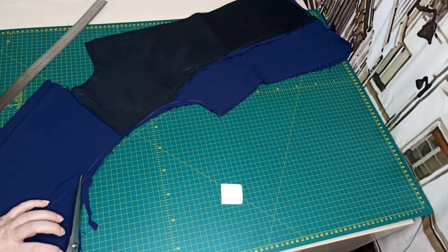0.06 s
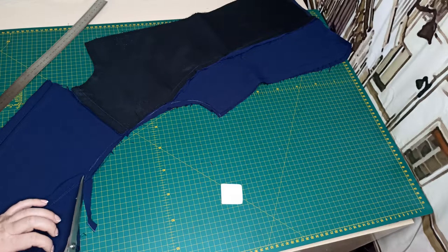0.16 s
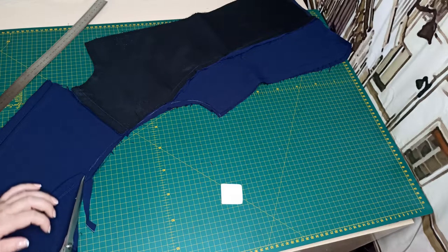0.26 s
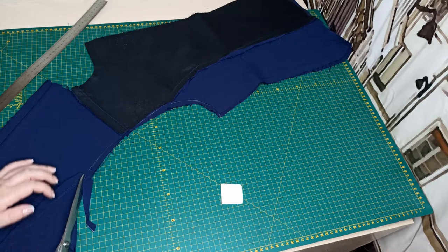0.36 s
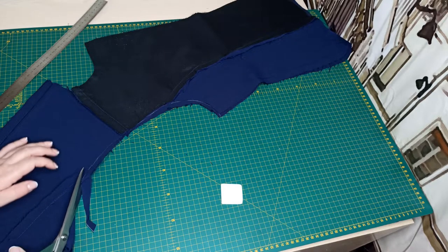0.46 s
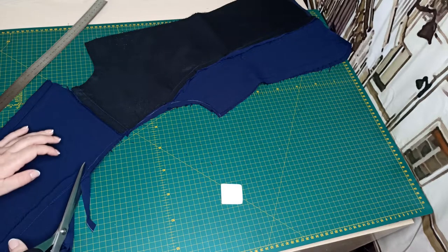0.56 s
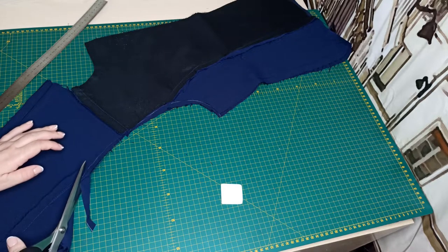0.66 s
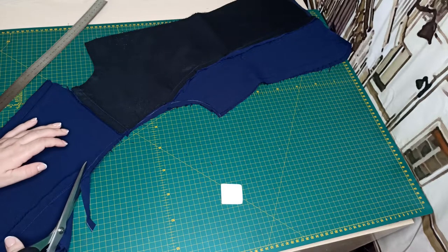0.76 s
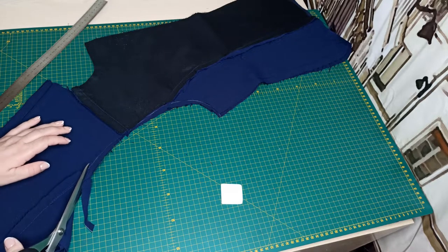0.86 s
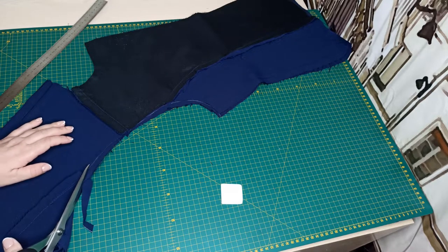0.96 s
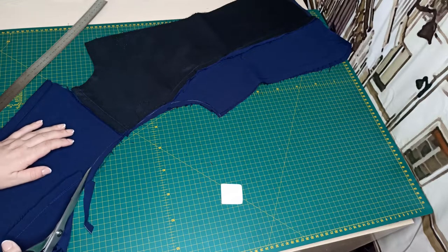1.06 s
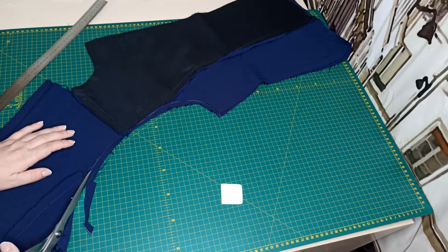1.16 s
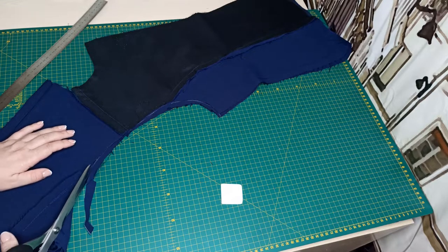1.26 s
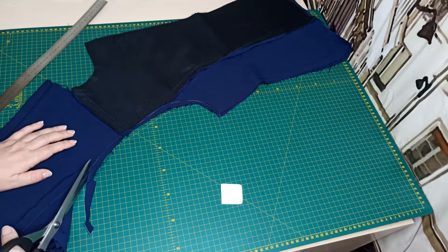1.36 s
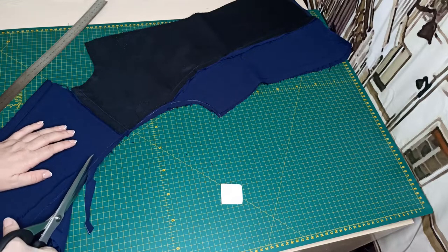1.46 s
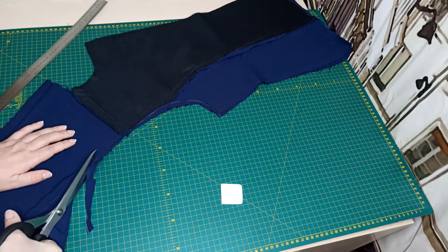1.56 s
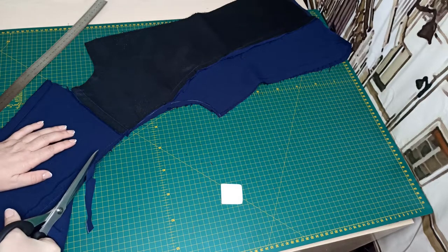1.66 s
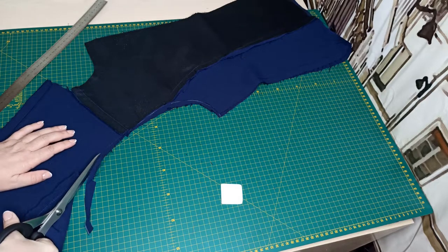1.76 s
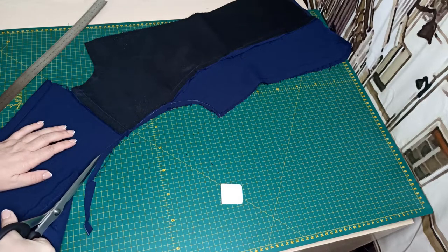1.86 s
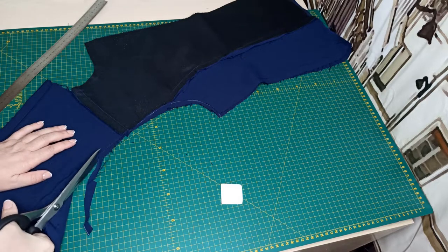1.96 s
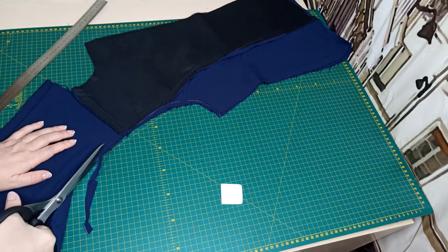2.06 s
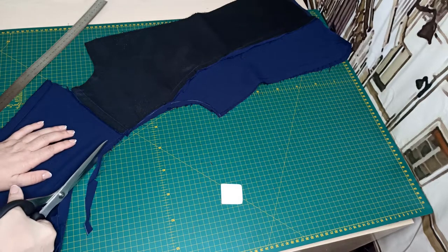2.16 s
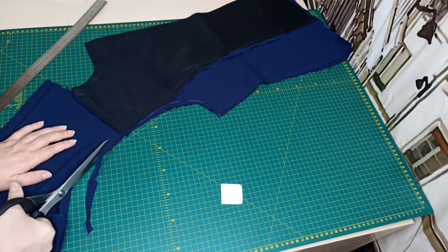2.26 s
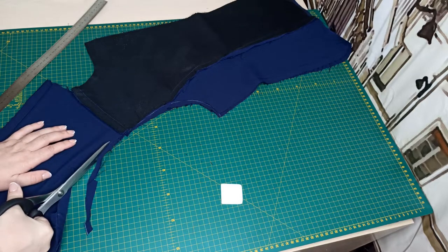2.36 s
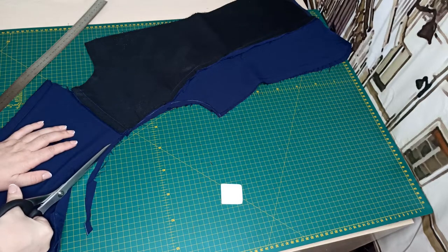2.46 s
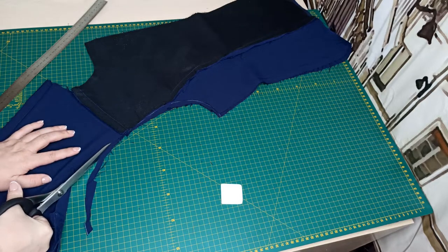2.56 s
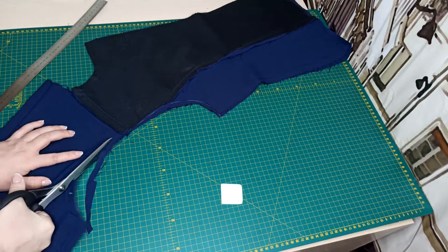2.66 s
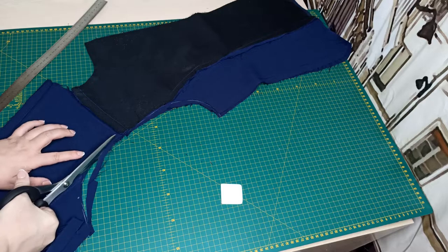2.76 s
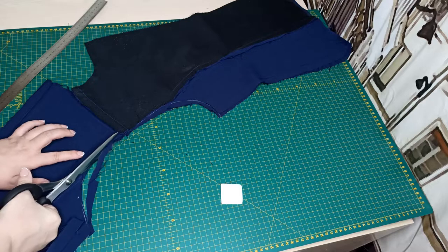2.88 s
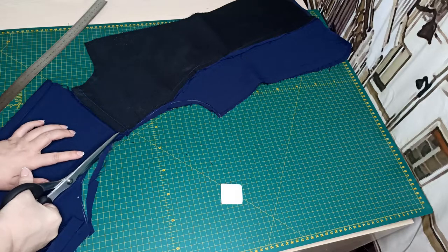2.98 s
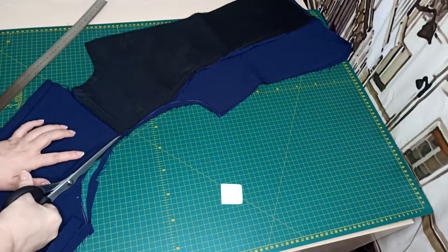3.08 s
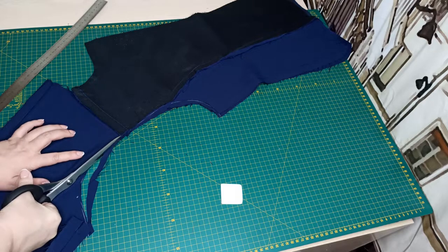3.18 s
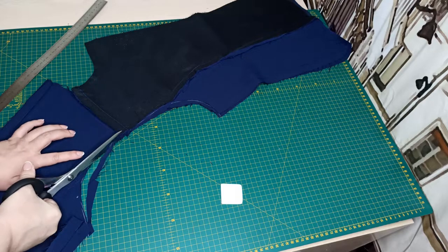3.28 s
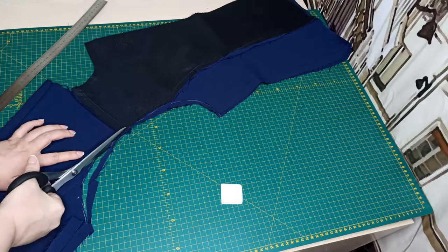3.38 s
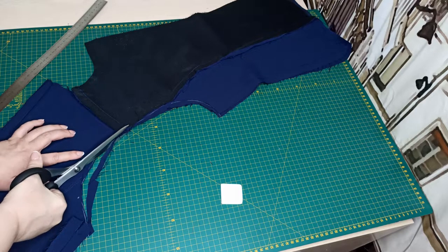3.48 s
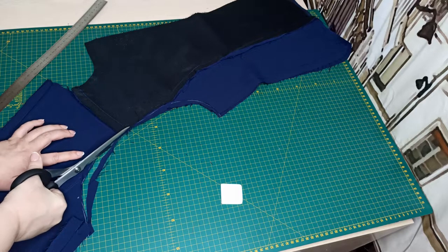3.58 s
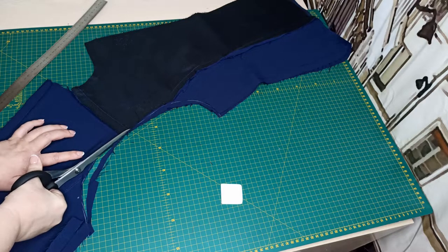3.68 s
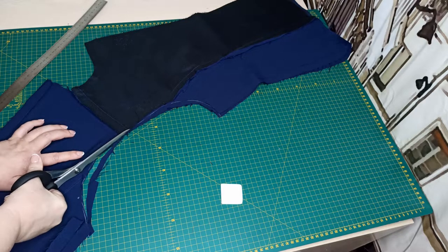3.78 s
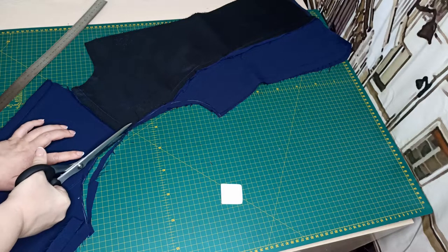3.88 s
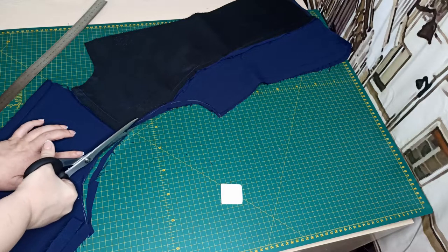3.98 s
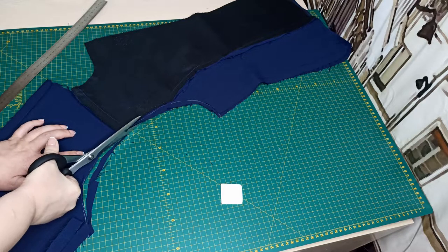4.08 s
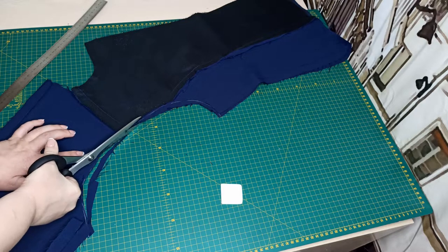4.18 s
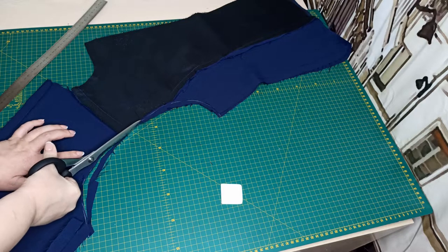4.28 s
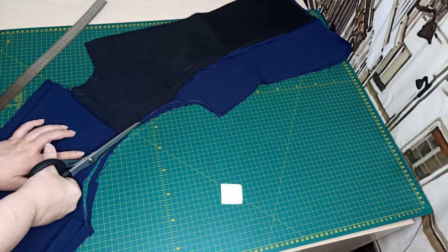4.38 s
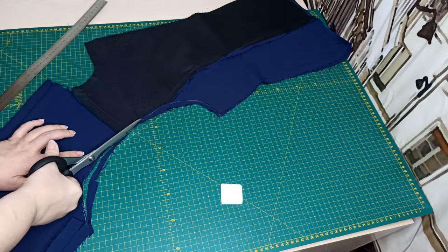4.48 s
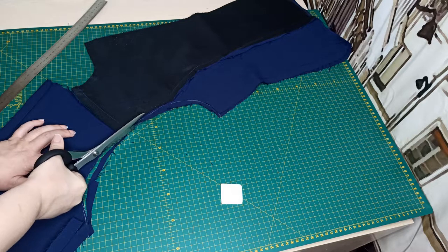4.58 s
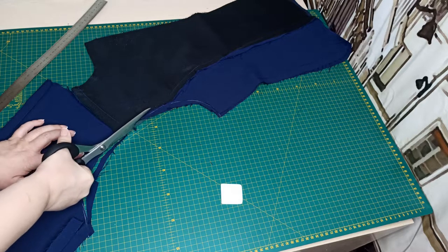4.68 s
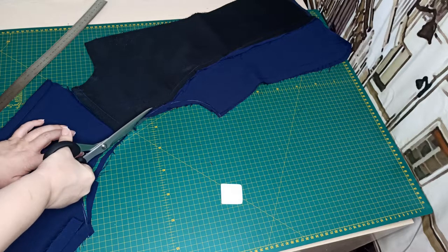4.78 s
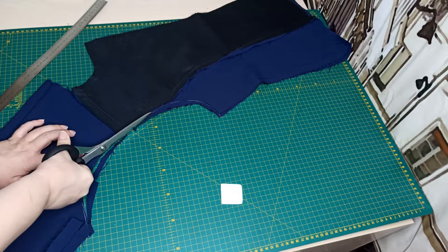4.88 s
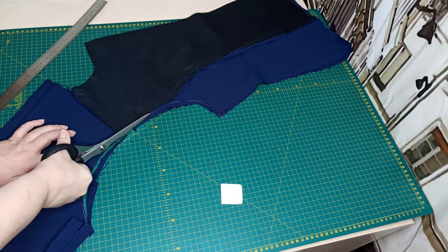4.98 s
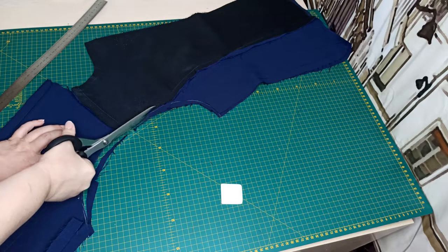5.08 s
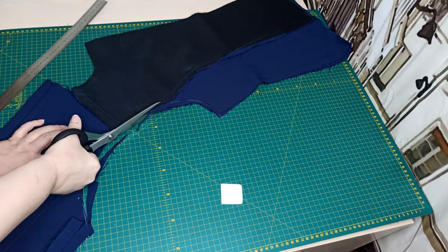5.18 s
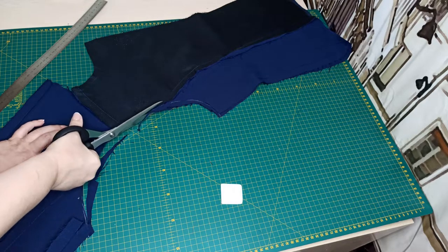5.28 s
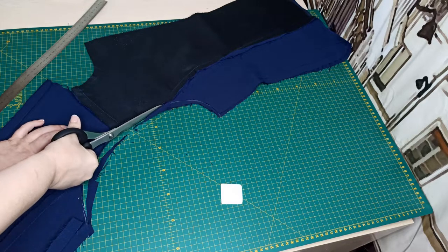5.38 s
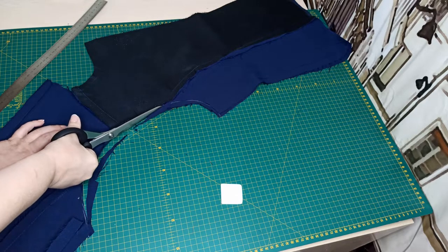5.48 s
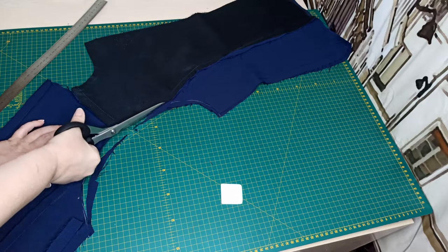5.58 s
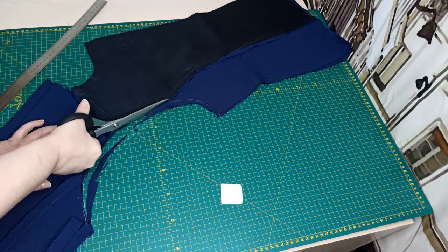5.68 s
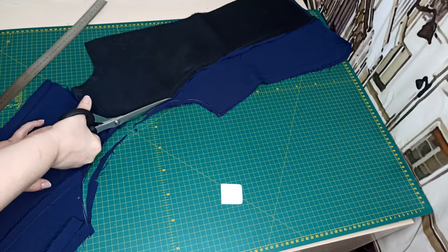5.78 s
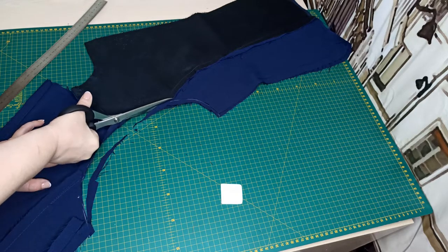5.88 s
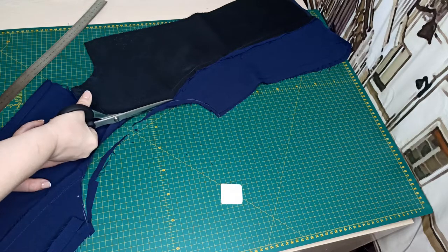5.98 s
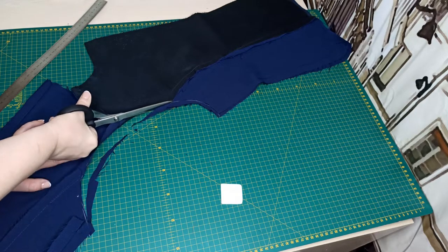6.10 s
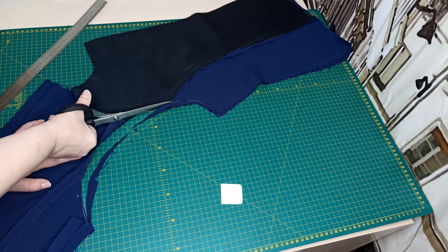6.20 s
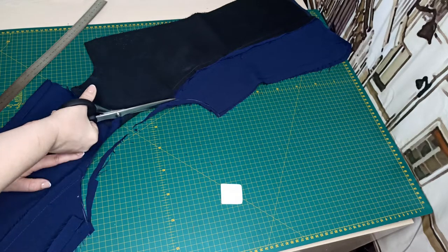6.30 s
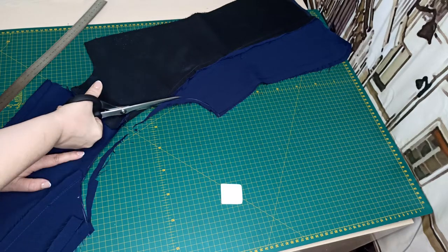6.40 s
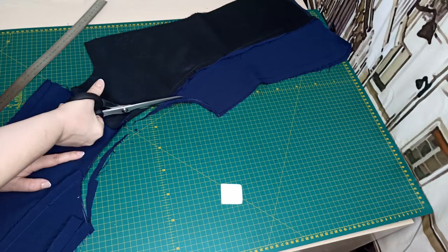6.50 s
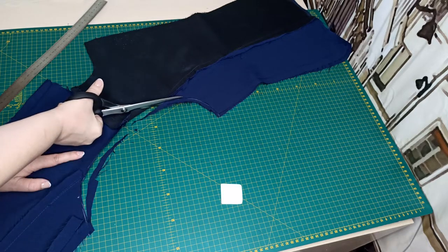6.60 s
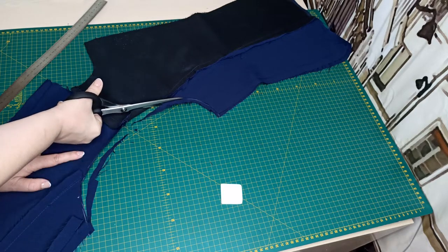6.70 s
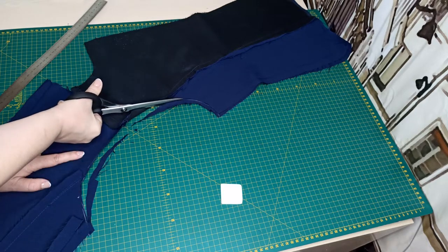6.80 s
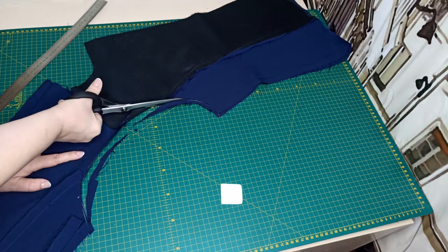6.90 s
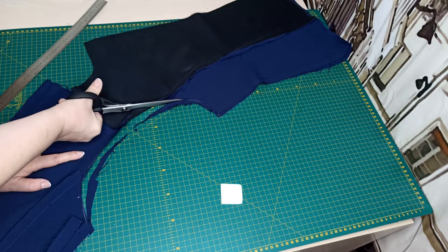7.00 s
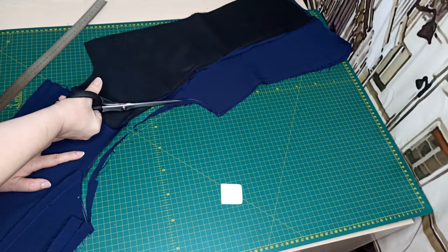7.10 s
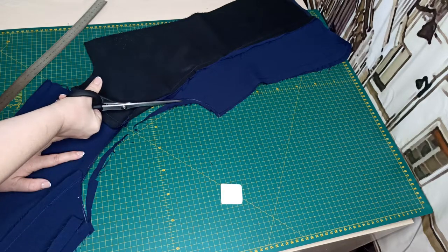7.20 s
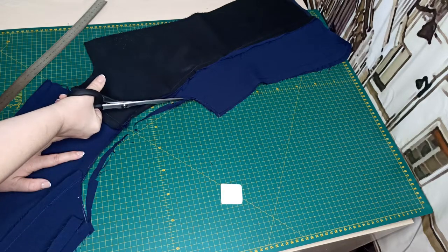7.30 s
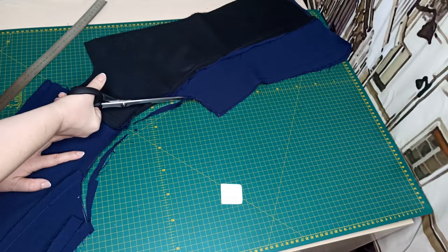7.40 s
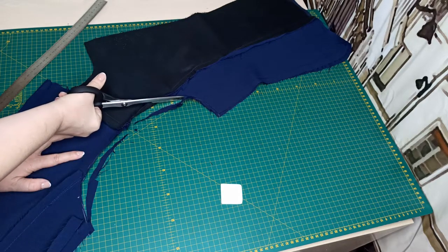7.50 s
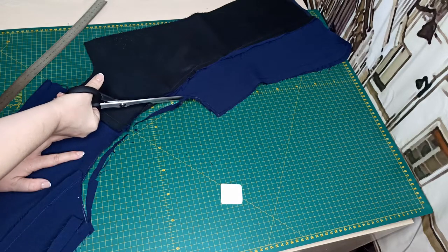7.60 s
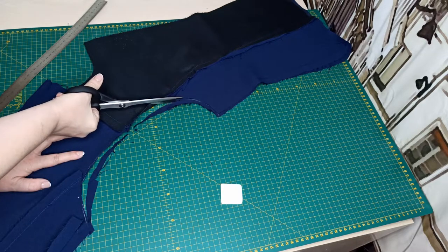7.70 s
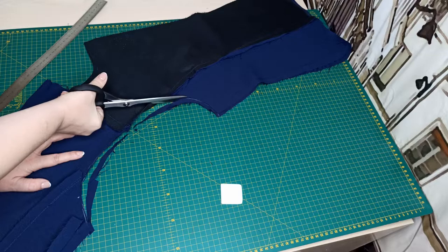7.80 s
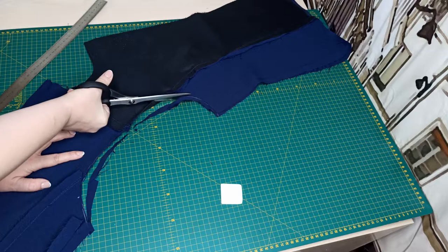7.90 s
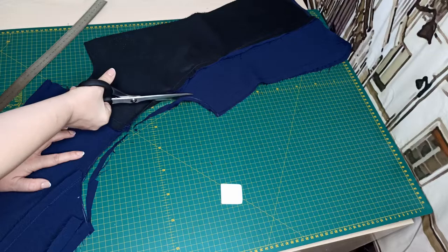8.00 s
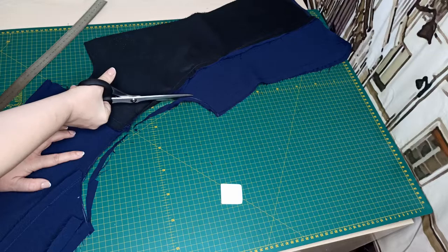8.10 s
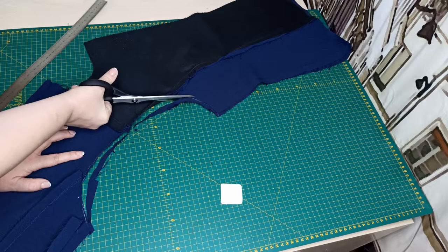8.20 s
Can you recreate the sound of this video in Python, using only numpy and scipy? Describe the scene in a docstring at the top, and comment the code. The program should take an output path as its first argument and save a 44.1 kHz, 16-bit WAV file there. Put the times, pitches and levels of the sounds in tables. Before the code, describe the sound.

Slow, regular scissor cuts in heavy fabric: gritty crunch, low table thump, faint steel rasp, then lighter ringing nips and ticks near the end.

```python
"""Tailor's shears cut thick cloth on a mat, on a table in a small room.
Closing strokes: random thread snaps, gated per stroke, drive table, mat and blade resonances.
Bites add sudden jolts and noise bursts; some strokes squeak in narrow noise bands.
Between strokes the blades slide on with a duller rub; late short nips and light taps ring steel.
Behind: steady room noise, and cloth rustle and hiss under the free hand."""
import sys
import numpy as np
from scipy import signal
from scipy.fft import rfft, irfft
from scipy.io import wavfile
from scipy.ndimage import uniform_filter1d

SR = 44100
rng = np.random.default_rng(int(sys.argv[2]) if len(sys.argv) > 2 else 0)


def unload_wav(signal):
    """Save mono or channel-first audio to the path in sys.argv[1] as 16-bit WAV at rate SR, clipped to [-1, 1]."""
    wavfile.write(
        sys.argv[1],
        SR,
        np.round(np.clip(np.atleast_2d(signal).T, -1, 1) * 32767).astype(np.int16),
    )


N = 363825
TIME = np.arange(N) / SR

# Levels in the tables are relative; each function applies its own gain.
# closing strokes: bite_s, length_s, lead_in_s, rumble_db, crunch_db, rasp_db
CLOSING_STROKES = [(0.101, 0.12, 0.0036, -34, -39.5, -56.5), (1.023, .036, .02, -40, -38, -56),
                   (1.09, 0.096, 0.0035, -27.5, -40, -51.5), (1.767, 0.077, 0.039, -29, -38.5, -55.5),
                   (2.423, 0.092, .045, -29.5, -39, -56.5), (3.056, 0.1, 0.031, -28.5, -38, -55),
                   (3.611, 0.11, 0.028, -27.5, -40.5, -51.5), (4.251, 0.16, 0.024, -33.5, -45.5, -55),
                   (4.866, 0.13, 0.026, -31, -40.5, -53), (5.396, 0.11, 0.025, -34, -37.5, -51.5),
                   (6.051, 0.14, 0.071, -43, -47, -55.5), (6.726, 0.12, 0.055, -54.5, -53.5, -62)]
# table top: pitch_hz, width_hz, edge_db, middle_db (driven at its edge / near its middle)
TABLE_RESONANCES = [(87, 25, -53, -9), (118.4, 12.6, -19, -11), (168.7, 11.4, 2.5, -10),
                    (194, 31.2, 1.5, -9.5), (223.8, 20, 2.5, 6.5), (304.7, 38.5, 0, -1.5),
                    (385.6, 35.7, -3.5, -2), (438.5, 13.4, 1, 7.5), (456.4, 32, -13.5, 5),
                    (540, 46, -8, 1.5), (651, 49, -1.5, -11.5)]
# bending of the blades: pitch_hz, width_hz, level_db
BLADE_RESONANCES = [(2236, 135, 1.5), (2627, 27, 6.5), (4670, 32, -1), (5230, 24, 0.5), (6270, 59, -22)]
# blade rasp spectrum: frequency_hz, density_db_per_hz
RASP_SPECTRUM = [(1500, -43.5), (2800, 0), (3500, 0.5), (4300, 6.5), (4680, 10), (4900, 3.5), (5700, -0.5),
                 (6400, 4), (7500, -4), (10000, -5), (13000, -2), (16000, -9.5)]
# threads parting, heard through the air: frequency_hz, density_db_per_hz
FIBRE_SPECTRUM = [(400, -21.5), (700, 3), (1400, 1.5), (1900, -2.5), (2600, -1.5), (3200, -13), (6000, -32)]


def cutting():
    """Threads snap one after another; each snap shakes the table, the mat and the blades."""
    rumble_gain, crunch_gain, rasp_gain = closing()
    snaps = grains(per_s=800, spread_db=5.0)
    steel_grind = from_db(-6.5) * grains(per_s=1500, spread_db=5.5)
    edge = snaps + steel_grind
    blade_sound = colour(edge, RASP_SPECTRUM) + from_db(10.5) * resonances(edge, BLADE_RESONANCES)

    table = from_db(-2.0) * rumble_gain * steady(body(snaps, TABLE_RESONANCES), span_s=0.0264)
    mat = from_db(-0.5) * crunch_gain * steady(crunching(snaps), span_s=0.026)
    blades = from_db(2.5) * rasp_gain * steady(blade_sound, span_s=0.026)
    cloth_surges = surges(per_s=110, depth_db=1.5)
    blade_surges = surges(per_s=83, depth_db=4.5) * surges(per_s=38, depth_db=1.5)
    return (table + mat) * cloth_surges + blades * blade_surges


def closing():
    """Gains: the edge presses in, then bites; crunch peaks early, rasp later, rumble releases slowest."""
    attack_s, release_s, rumble_release_s = 0.0053, 0.022, 0.063
    s, length_s, lead_s, rumble_db, crunch_db, rasp_db = np.transpose(CLOSING_STROKES)
    rumble = strokes(s, length_s, rumble_db, attack_s, rumble_release_s,
                     peak_share=0.3, swell_db=3, sag_db=7.5)
    crunch = strokes(s, length_s, crunch_db, attack_s, release_s,
                     peak_share=0.2, swell_db=2, sag_db=6.5)
    rasp = strokes(s, length_s, rasp_db, attack_s, release_s,
                   peak_share=0.55, swell_db=8.5, sag_db=4)
    # softer pressure before the bite
    lead_levels_db = (rumble_db - 8, crunch_db - 9, rasp_db - 11.5)
    leads = [strokes(s - lead_s, lead_s, db, 0.017, attack_s, peak_share=0.85, swell_db=5)
             for db in lead_levels_db]
    return np.array([rumble, crunch, rasp]) + leads


def crunching(force):
    """Mat and blades resonate; the fibres' own broad crack follows 2.5 ms later through the air."""
    # mat and blades under the cloth: pitch_hz, width_hz, edge_db, middle_db
    crunch_resonances = [(729, 112, -4, 6), (890, 69, 4.5, 3.5), (1002, 36, 3, 1), (1022, 99, -0.5, 10.5),
                         (1253, 193, -3.5, 6), (1349, 71, 5.5, 5), (1457, 200, 3, -8), (1505, 330, -4, -20),
                         (2470, 260, -30, -30), (2437, 200, -25.5, -10)]
    crack = np.roll(colour(force, FIBRE_SPECTRUM), SR // 400)
    return body(force, crunch_resonances) + from_db(-17.0) * crack


def biting():
    """A bundle of threads gives way at once; the blade rings and jolts the table."""
    # bites: start_s, crunch_db, thump_db, rasp_db
    bites = [(0.047, -29, -23.5, -63), (0.098, -18.5, -45, -55), (0.107, -22, -12, -66),
             (0.393, -33.5, -34, -80), (0.431, -33.5, -27.5, -71), (0.807, -43, -36.5, -77),
             (0.978, -34, -32, -64), (1.024, -23, -18.5, -50.5), (1.086, -17, -17.5, -45.5),
             (1.1, -15.5, -8.5, -48), (1.766, -51, -21, -51), (1.871, -21.5, -18.5, -49),
             (2.434, -25.5, -23, -54), (2.654, -38, -28, -77), (3.047, -32, -43, -52),
             (3.058, -51, -14, -70), (3.116, -48, -21, -46), (3.612, -46, -18, -57), (3.66, -33, -13, -54),
             (4.238, -53, -27.5, -64), (4.258, -26.5, -28, -62), (4.28, -49, -34, -58),
             (4.317, -58, -16, -57), (4.387, -31.5, -28, -49), (4.855, -42, -39, -54.5),
             (4.98, -31.5, -20.5, -50), (5.402, -38, -30, -47), (5.499, -50, -24.5, -56),
             (6.051, -27, -30.5, -49), (6.091, -40, -36, -57), (6.125, -34.5, -29.5, -49.5),
             (6.164, -41, -28.5, -50)]
    s, crunch_db, thump_db, rasp_db = np.transpose(bites)
    jolts = np.full(N, 1e-18)
    jolts[(s * SR).astype(int)] = from_db(thump_db)
    thump = from_db(35.5) * body(jolts, TABLE_RESONANCES)
    crunch = from_db(6.5) * crunching(bursts(s, crunch_db, rise_s=0.0003, decay_s=0.0073))
    scrape = bursts(s, rasp_db, rise_s=0.0056, decay_s=0.0036)
    rasp = from_db(6) * colour(scrape, RASP_SPECTRUM)
    ring = from_db(-4.0) * resonances(scrape, BLADE_RESONANCES)
    return thump + crunch + rasp + ring


def squeaking():
    """In some strokes edge sticks and slips on edge: narrow-band noise under a bell-shaped gain."""
    # squeaks: middle_s, half_length_s, pitch_hz, level_db
    squeaks = [(1.8, 0.028, 4620, -54), (1.807, 0.022, 5100, -56.5), (1.815, 0.014, 2220, -50),
               (1.876, 0.0038, 4700, -44), (1.88, 0.0043, 2210, -47), (2.47, 0.024, 4960, -50.5),
               (4.328, 0.028, 6520, -55.5), (4.343, 0.022, 4760, -55), (4.928, 0.022, 4640, -55),
               (5.45, 0.031, 4640, -56)]
    out = 0
    for s, half_s, hz, db in squeaks:
        chatter = resonance(rng.standard_normal(N), hz, width=hz / 11)
        chatter = resonance(chatter, hz, width=hz / 11)
        gain = from_db(db - ((TIME - s) / half_s) ** 2 * 5.2)
        out = out + gain * rms_one(chatter)
    return out


def sliding():
    """The lower blade judders over the mat in small soft slips."""
    # mat rub spectrum: frequency_hz, density_db_per_hz
    rub_spectrum = [(400, -12.5), (700, 9.5), (900, 8), (1150, 7.5), (1400, 6), (1700, -14.5), (2400, -11),
                    (3200, -22), (4500, -19), (7000, -29), (13000, -34), (16000, -39)]
    # slip force spectrum: frequency_hz, density_db_per_hz
    slip_spectrum = [(100, -2), (170, -0.5), (220, 1.5), (310, 2), (430, 6.5), (560, 2.5), (700, -3),
                     (1500, -1)]
    rumble_gain, rub_gain = opening()
    slips = grains(per_s=1400, spread_db=4.5)
    table_sound = body(colour(slips, slip_spectrum), TABLE_RESONANCES)
    table = from_db(-1.25) * rumble_gain * steady(table_sound, span_s=0.064)
    rub = from_db(-3.5) * rub_gain * steady(colour(slips, rub_spectrum), span_s=0.09)
    return table + rub


def opening():
    """Gains as the blades open and slide: the rub peaks early, the table rumble later."""
    # slides: start_s, length_s, rumble_db, rub_db
    slides = [(0.018, 0.038, -37.5, -45), (0.397, 0.092, -35, -49.5), (0.806, 0.13, -44, -46.5),
              (0.968, 0.05, -44.5, -46), (1.285, .1, -34, -37.5), (1.957, 0.088, -32, -39),
              (2.627, 0.11, -34, -42), (3.26, 0.11, -35, -43), (3.835, 0.1, -32, -44),
              (4.508, 0.075, -35, -40), (5.091, 0.099, -38, -41.5), (5.623, 0.1, -43, -46),
              (6.329, 0.078, -43, -46), (7.33, 0.071, -45, -52)]
    attack_s, release_s = 0.015, 0.041
    s, length_s, rumble_db, rub_db = np.transpose(slides)
    rumble = strokes(s, length_s, rumble_db, attack_s, release_s,
                     peak_share=0.54, swell_db=7.5, sag_db=9)
    rub = strokes(s, length_s, rub_db, attack_s, release_s,
                  peak_share=0.25, swell_db=10.5, sag_db=34)
    return rumble, rub


def nipping():
    """The tips close on the last threads: short, ringing crunches with little weight on the table."""
    # nips: start_s, crunch_db, thump_db
    nips = [(6.697, -43.5, -50.5), (6.744, -38.5, -54), (6.808, -36.5, -36), (6.851, -34.5, -48.5),
            (6.972, -29.5, -40.5), (7.0, -31, -39), (7.136, -28, -39.5)]
    # blades struck near their tips: pitch_hz, width_hz, level_db
    tip_resonances = [(576, 49, -18), (735, 220, 4.5), (885, 60, 5), (1004, 130, 5), (1194, 56, 11.5),
                      (1300, 66, 5), (1556, 130, 2), (1870, 180, -6), (2160, 260, -3.5), (2490, 260, -2.5),
                      (2910, 390, -4.5), (3570, 610, -13), (4200, 320, -9.5), (7300, 250, -29)]
    s, crunch_db, thump_db = np.transpose(nips)
    snap = bursts(s, crunch_db, rise_s=0.0042, decay_s=0.0086)
    joint_buzz = from_db(-9.0) * bursts(s, crunch_db, rise_s=0.024, decay_s=0.009)
    force = snap + joint_buzz
    thump = bursts(s + 0.00304, thump_db, rise_s=0.0049, decay_s=0.011)
    steel = from_db(4.5) * resonances(force, tip_resonances)
    fibres = from_db(-18) * colour(force, FIBRE_SPECTRUM)
    rasp = from_db(-10.5) * colour(snap, RASP_SPECTRUM)
    return steel + fibres + rasp + from_db(25) * body(thump, TABLE_RESONANCES)


def tapping():
    """Light contacts of handles and blades: a dry tick with a brief rattle of the loose joint."""
    # contacts: start_s, level_db
    taps = [(2.793, -51), (6.528, -57), (7.547, -37), (8.019, -52), (8.102, -47.5), (8.145, -49.5)]
    # loosely held shears: pitch_hz, width_hz, level_db
    handle_resonances = [(615, 320, -9), (970, 290, -1.5), (1160, 120, -1), (1480, 140, -11.5),
                         (2300, 350, -13.5), (3020, 190, -14), (4230, 3300, -28.5)]
    s, level_db = np.transpose(taps)
    ticks = bursts(s, level_db, rise_s=0.00064, decay_s=0.0098)
    return from_db(18.0) * resonances(ticks, handle_resonances)


def brightened(x):
    """Level above 10 kHz falls steadily as the edges dull on their way inwards."""
    start_db, loss_db_per_s = 4.5, 0.85
    top = signal.sosfiltfilt(signal.butter(2, 10000, "high", fs=SR, output="sos"), x)
    return x + (from_db(start_db - loss_db_per_s * TIME) - 1) * top


def room(x, early_db, early_s):
    """Direct sound, a quick scatter off nearby surfaces, a diffuse tail, and standing waves in the lows."""
    # reverberation: frequency_hz, t60_s
    reverb_times = [(150, 0.5), (450, 0.18), (1200, 0.31), (4000, 0.18), (14000, 0.3)]
    # diffuse tail: frequency_hz, level_db
    tail_levels = [(150, -5), (450, -7), (1000, -8), (3000, -4), (14000, -22)]
    # standing waves: pitch_hz, width_hz, level_db
    standing_waves = [(115.1, 2.8, 4.5), (182.7, 11, 1), (226.9, 4.5, 0.5), (312.7, 2.8, 3.5),
                      (388.4, 3.8, 3.5), (427.4, 3, 0), (490, 12, 12.5), (555, 4.4, 5.5), (644, 2.4, -27),
                      (760, 3.1, -19), (894, 8.4, -20), (965, 7, -4)]
    age = TIME[:SR * 3 // 4]
    edges_hz = np.geomspace(70, 18000, 9)
    scatter = rng.standard_normal(len(age)) * age * np.exp(-age / early_s)
    scatter = signal.sosfilt(signal.butter(2, 1100, "high", fs=SR, output="sos"), scatter)
    response = from_db(early_db) * scatter / np.linalg.norm(scatter)
    for low, high in zip(edges_hz, edges_hz[1:]):
        hz = np.sqrt(low * high)
        decay = from_db(-60 * age / at_hz(reverb_times, hz)) * np.minimum(age / 0.025, 1)
        band_pass = signal.butter(2, [low, high], "band", fs=SR, output="sos")
        band = signal.sosfilt(band_pass, rng.standard_normal(len(age)))
        response += from_db(at_hz(tail_levels, hz)) * band * decay / np.linalg.norm(decay)
    standing = sum(from_db(db) * resonance(x, hz, width) for hz, width, db in standing_waves)
    return x + signal.fftconvolve(x, response)[:N] + from_db(-5.0) * standing


def background():
    """Steady room noise, and the rustle and hiss of cloth shifting under the free hand."""
    # free hand smoothing the cloth: time_s, rustle_db, hiss_db
    hand = [(0, -51.5, -70), (.6, -59, -67.5), (.85, -76, -69.5), (1.7, -54.5, -65.5), (2.35, -71, -69),
            (2.8, -59, -68.5), (3.5, -72, -68), (4.799, -68, -69), (5.9, -69, -70), (6.3, -63.5, -68),
            (6.62, -66.5, -71.5), (6.9, -49, -65.5), (7.5, -59, -72), (8.25, -54.5, -69.5)]
    # room noise spectrum: frequency_hz, density_db_per_hz
    air_spectrum = [(20, -66), (40, -56), (60, -3), (100, 2), (220, -0.5), (330, -5), (700, -8),
                    (1400, -16.5), (2200, -21.5), (5000, -57), (16000, -50)]
    # hand and sleeve on the cloth: frequency_hz, density_db_per_hz
    sleeve_spectrum = [(30, -47.5), (60, -7.5), (110, 2.5), (230, 3), (350, -3.5), (600, -11.5),
                       (1200, -18), (2500, -31), (6000, -49)]
    # cloth hiss spectrum: frequency_hz, density_db_per_hz
    hiss_spectrum = [(600, -4.5), (2000, -0.5), (3000, -0.5), (4500, 2), (5000, -7.5), (5900, -8.5),
                     (6400, -1), (7600, -8.5), (10000, 2.5), (12500, -10.5), (16000, -4)]
    s, rustle_db, hiss_db = np.transpose(hand)
    air = from_db(-63) * rms_one(colour(rng.standard_normal(N), air_spectrum))
    rustle = rms_one(colour(grains(per_s=1500, spread_db=1.0), sleeve_spectrum))
    rustle = rustle * surges(per_s=19, depth_db=2.5)
    hiss = rms_one(colour(grains(per_s=12000, spread_db=2.0), hiss_spectrum)) * resting()
    rustle_gain = from_db(np.interp(TIME, s, rustle_db))
    hiss_gain = from_db(np.interp(TIME, s, hiss_db))
    return air + rustle_gain * rustle + hiss_gain * hiss


def resting():
    """Gain of the cloth hiss: it drops as the hand rests before each cut, and recovers after the bite."""
    rest_s, drop_db = 0.096, 2
    starts = np.transpose(CLOSING_STROKES)[0]
    rests = [np.interp(TIME, [s - 2 * rest_s, s - rest_s, s, s + rest_s], [0, 1, 1, 0])
             for s in starts]
    return from_db(-drop_db * np.max(rests, axis=0))


def strokes(starts, lengths, levels_db, attack_s, release_s, peak_share=.5, swell_db=0, sag_db=0):
    """Gain of a run of strokes: each sets in, swells to its peak, sags towards its end and is released."""
    out, share = 0, np.clip(peak_share, 0, 1)
    for s, length_s, db in zip(starts, lengths, levels_db):
        moments = s + np.array([-attack_s, 0, share * length_s, length_s, length_s + release_s])
        gains = [0, from_db(db - swell_db), from_db(db), from_db(db - sag_db), 0]
        out = out + np.interp(TIME, moments, gains)
    return out


def grains(per_s, spread_db):
    """Clicks at random moments, of unequal size."""
    born = rng.random(N) < per_s / SR
    sign = rng.choice([-1, 1], N)
    size = from_db(spread_db * np.clip(rng.standard_normal(N), -2, 2))
    return born * sign * size + 1e-18


def bursts(times, levels_db, rise_s, decay_s):
    """At each time a burst of random-sign samples that rises quickly and dies away."""
    out, age = np.zeros(N + SR), TIME[:SR // 8]
    shape = np.minimum(age / rise_s, np.exp(-(age - rise_s) / decay_s))
    for s, db in zip(times, levels_db):
        at = int(s * SR)
        out[at:at + len(age)] += from_db(db) * shape * rng.choice([-1, 1], len(age))
    return out[:N] + 1e-18


def surges(per_s, depth_db):
    """A gain that jumps about as the cloth resists and yields."""
    knots = np.clip(rng.standard_normal(4000), -2, 2)
    return from_db(depth_db * np.interp(TIME * per_s, np.arange(len(knots)), knots))


def body(force, modes):
    """Parallel resonances; their shares change as the shears travel inwards and lean on the table."""
    # lean of the lower blade: time_s, bass_tilt_db_per_octave (about 400 Hz)
    lean = [(.15, -0.5), (2.7, 1.5), (3.65, 2.5), (4.3, 2), (5.0, -1.5), (5.45, 1), (6.1, 1.5), (6.8, 4.5),
            (7.4, 6.5)]
    out, travel = 0, TIME / TIME[-1]
    tilt_db = np.interp(TIME, *np.transpose(lean))
    for k, (hz, width, edge_db, middle_db) in enumerate(modes):
        octaves_below = max(np.log2(400 / hz), -1)
        share_db = (1 - travel) * edge_db + travel * middle_db + tilt_db * octaves_below
        out = out + (-1) ** k * from_db(share_db) * resonance(force, hz, width)
    return out


def resonances(force, modes):
    """Parallel resonances with alternating signs."""
    return sum((-1) ** k * from_db(db) * resonance(force, hz, width)
               for k, (hz, width, db) in enumerate(modes))


def resonance(force, hz, width):
    """Two-pole resonance with unit gain at its top."""
    r = np.exp(-np.pi * width / SR)
    zeros = [(1 - r * r) / 2, 0, (r * r - 1) / 2]
    poles = [1, -2 * r * np.cos(2 * np.pi * hz / SR), r * r]
    return signal.lfilter(zeros, poles, force)


def colour(x, spectrum):
    """Causal (minimum-phase) filter with the given spectrum, by folding its cepstrum."""
    size = 8192
    magnitude = from_db(at_hz(spectrum, np.fft.rfftfreq(size, 1 / SR)))
    cepstrum = irfft(np.log(magnitude))
    cepstrum[1:size // 2] *= 2
    cepstrum[size // 2 + 1:] = 0
    impulse = irfft(np.exp(rfft(cepstrum)))
    return signal.fftconvolve(x, impulse)[:N]


def at_hz(points, hz):
    """Read a spectrum on a log-frequency axis."""
    known_hz, values = np.transpose(points)
    return np.interp(np.log(np.maximum(hz, 1)), np.log(known_hz), values)


def steady(x, span_s):
    """Unit power over each short span; the finer crackle stays."""
    power = np.abs(uniform_filter1d(x ** 2, int(span_s * SR) + 1))
    return x / np.sqrt(power + 1e-14)


def rms_one(x):
    """Scale to unit power."""
    return x / np.sqrt(np.mean(x ** 2) + 1e-20)


def from_db(db):
    """Decibels to gain."""
    return 10 ** (np.asarray(db) / 20)


def scene():
    """The shears in the room, over the background."""
    shears = brightened(cutting() + squeaking() + sliding() + biting() + nipping() + tapping())
    in_room = from_db(-2.5) * room(shears, early_db=-3.5, early_s=0.0049)
    return (in_room + background())[None]


def record(dry):
    """A deep, stepped scoop in the treble, then a steep top cut."""
    # treble scoop: frequency_hz, gain_db
    treble_scoop = [(20, 0), (7550, 0), (7750, -7), (8450, -7), (8600, -17), (11450, -17), (11650, 0),
                    (20000, 0)]
    cutoff_hz = 15850
    coloured = colour(dry[0], treble_scoop)
    top_cut = signal.ellip(12, .1, 80, cutoff_hz, fs=SR, output="sos")
    return signal.sosfilt(top_cut, coloured)[None]


dry = scene()
out = record(dry)
unload_wav(out)
```